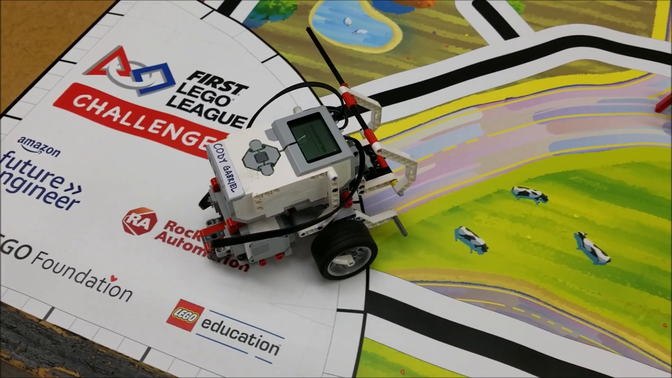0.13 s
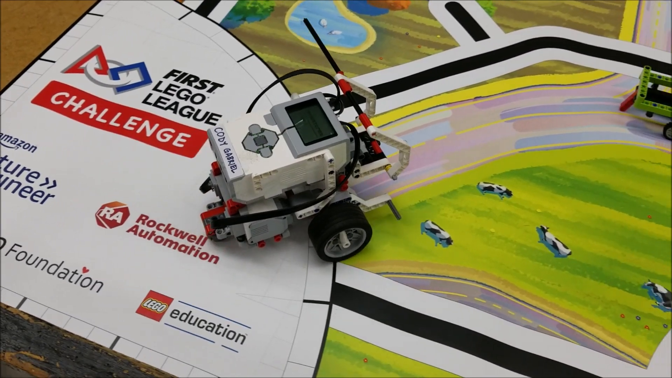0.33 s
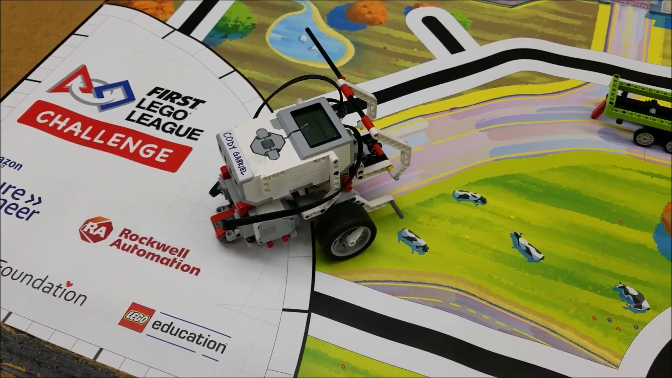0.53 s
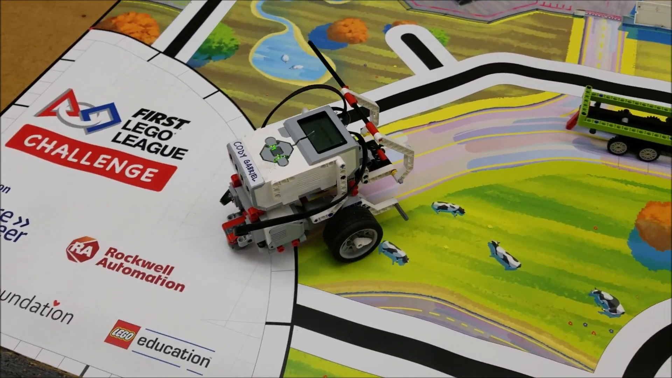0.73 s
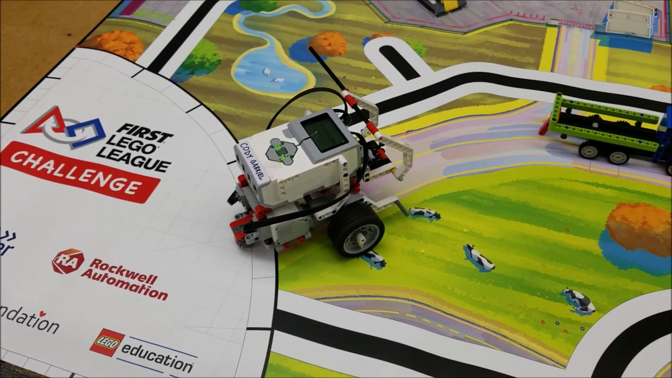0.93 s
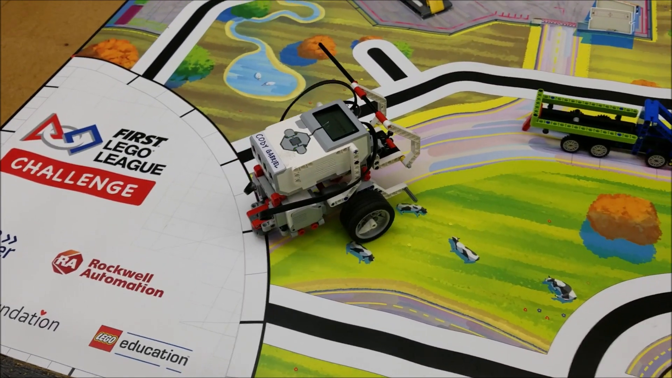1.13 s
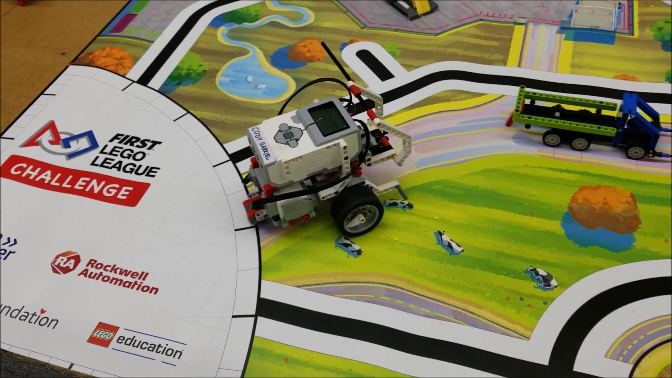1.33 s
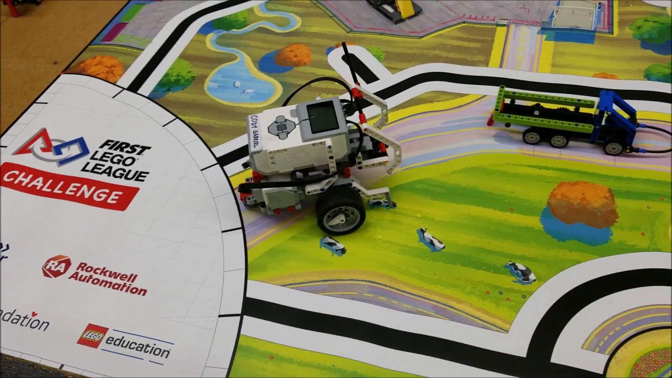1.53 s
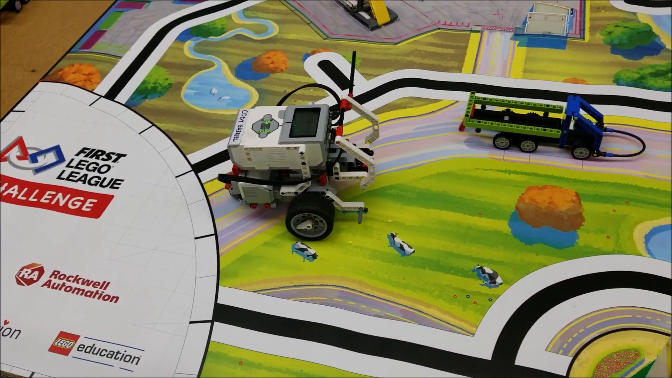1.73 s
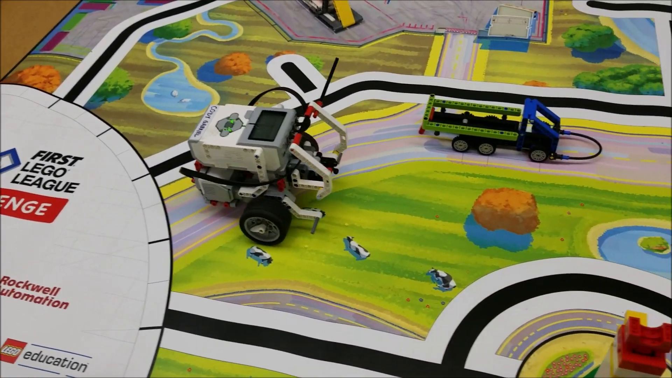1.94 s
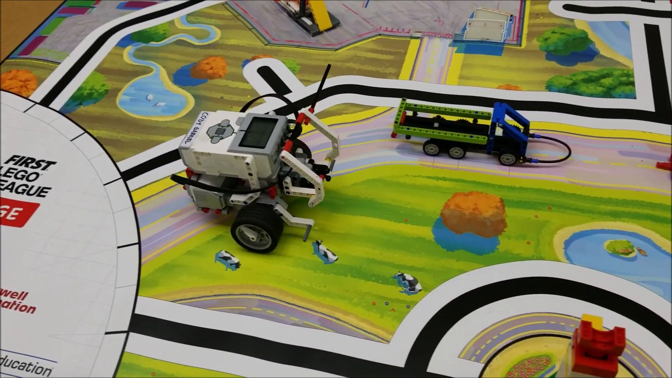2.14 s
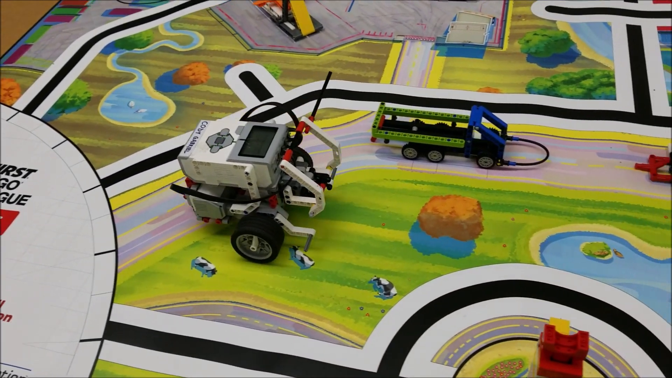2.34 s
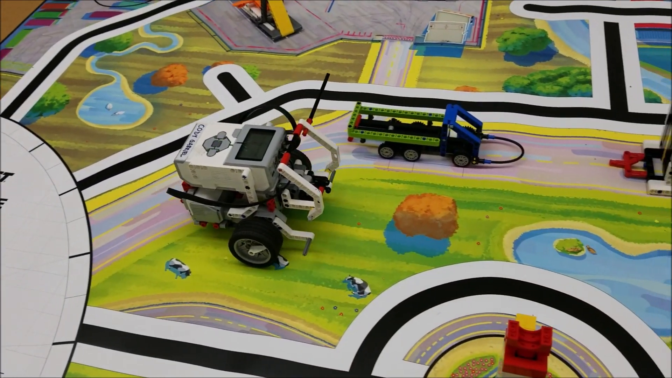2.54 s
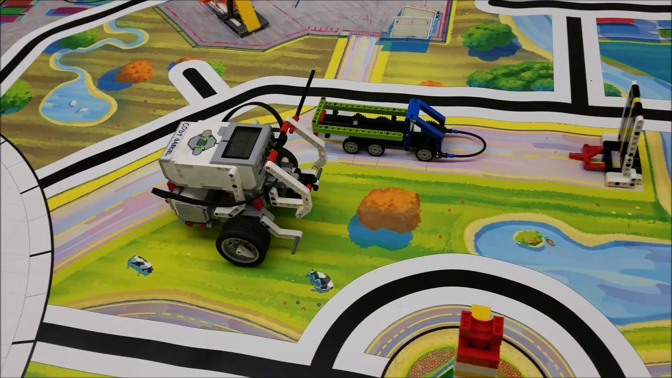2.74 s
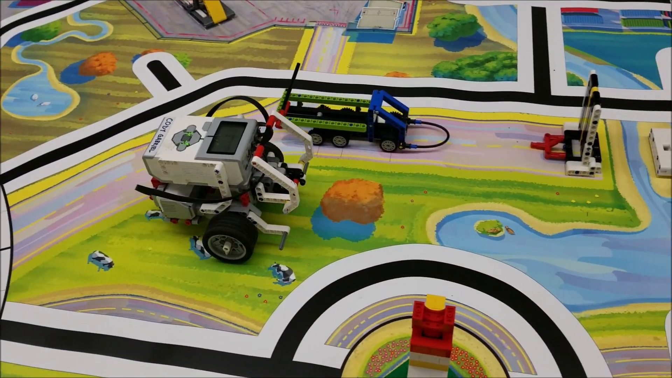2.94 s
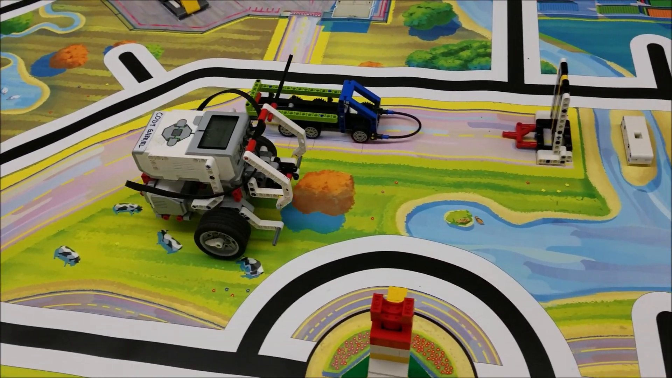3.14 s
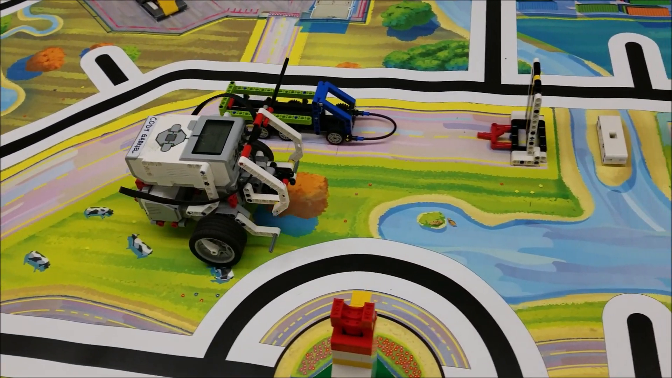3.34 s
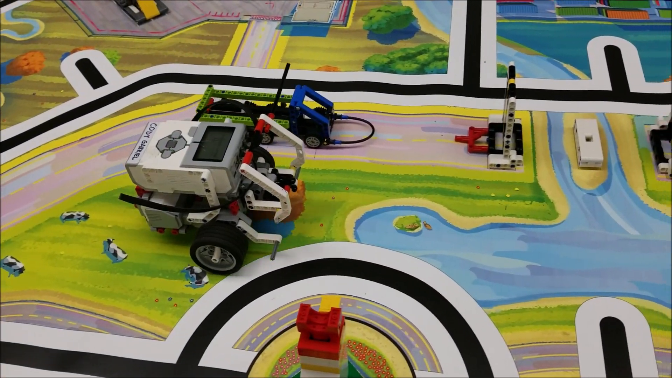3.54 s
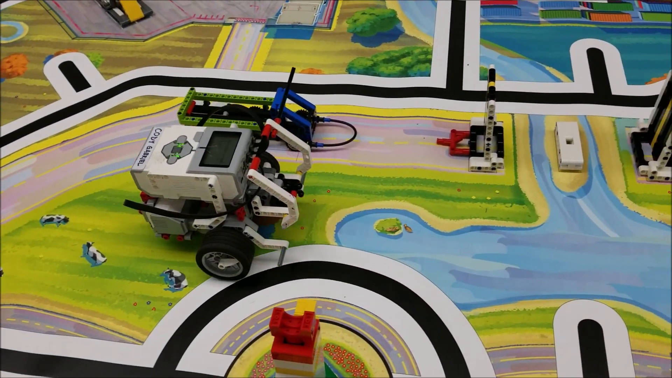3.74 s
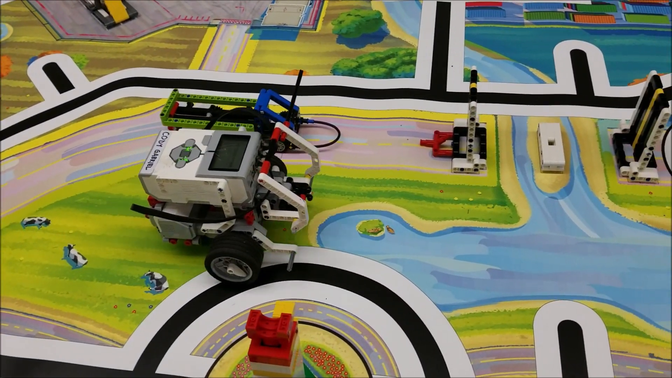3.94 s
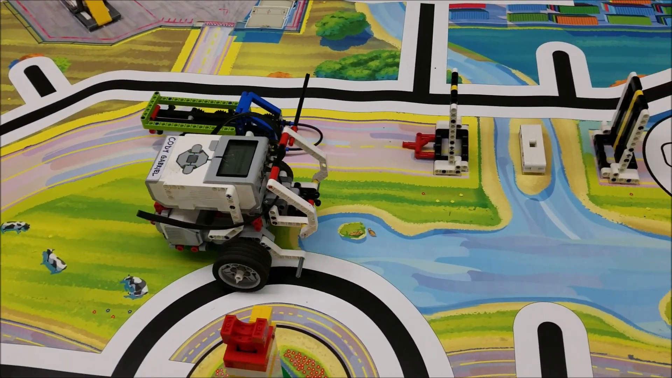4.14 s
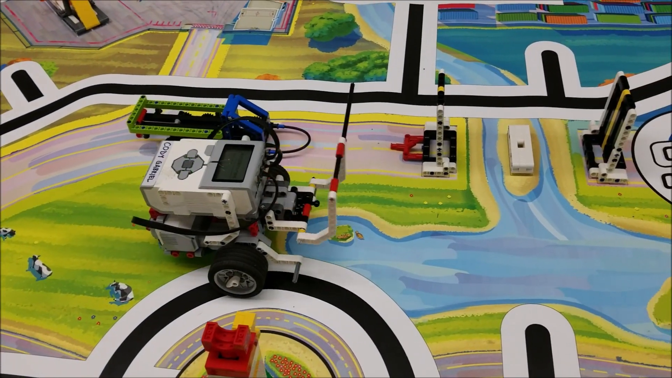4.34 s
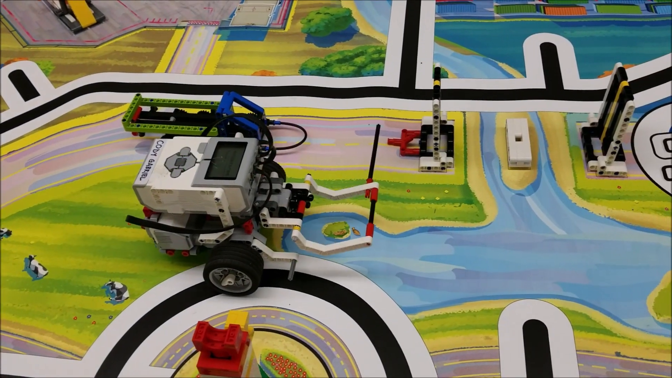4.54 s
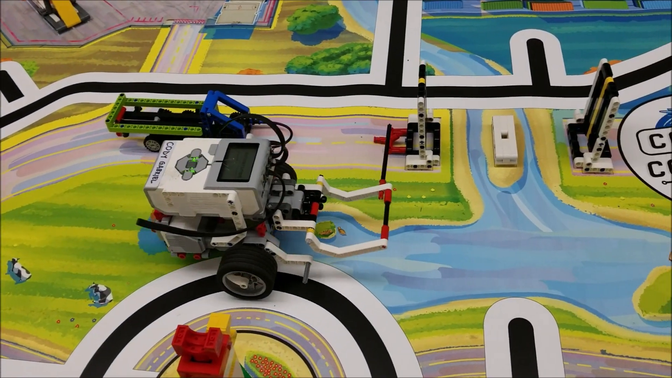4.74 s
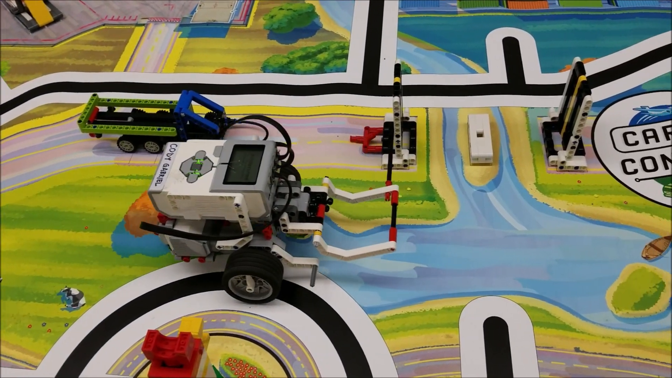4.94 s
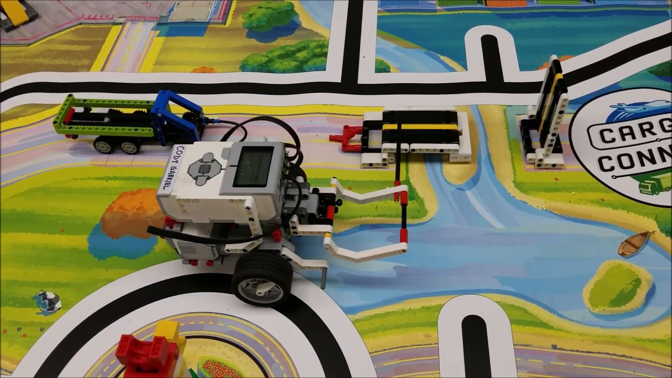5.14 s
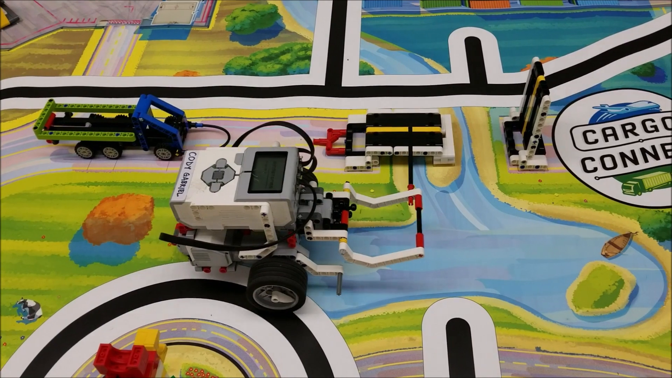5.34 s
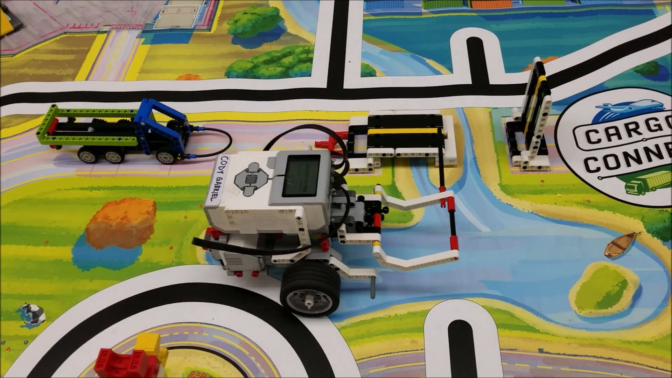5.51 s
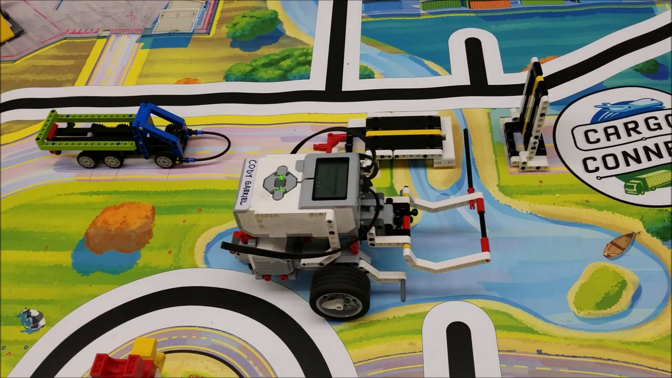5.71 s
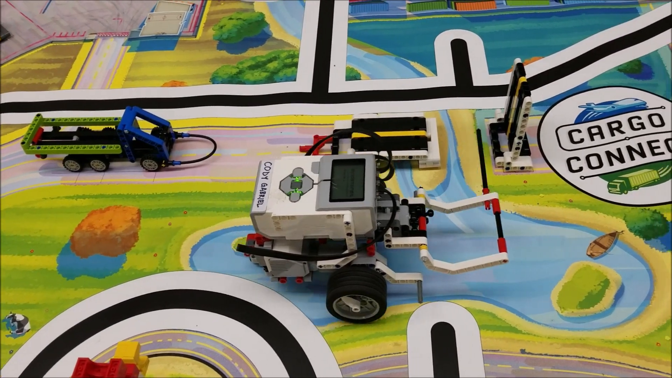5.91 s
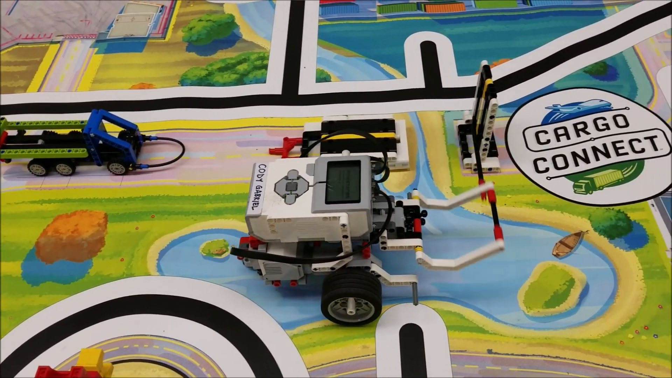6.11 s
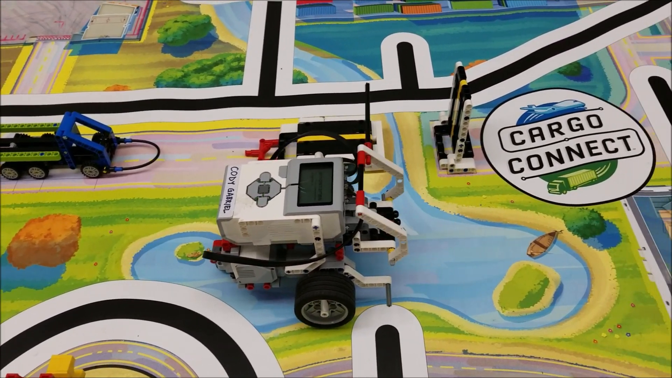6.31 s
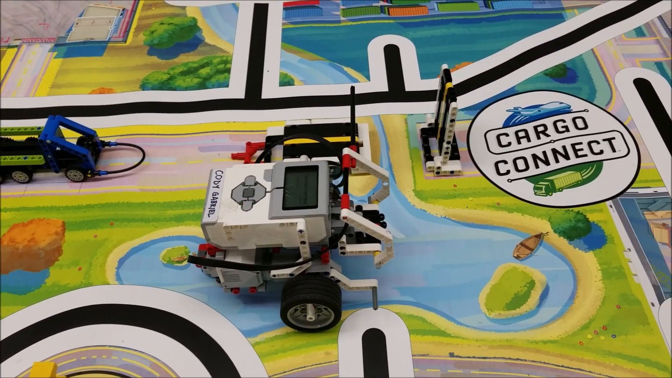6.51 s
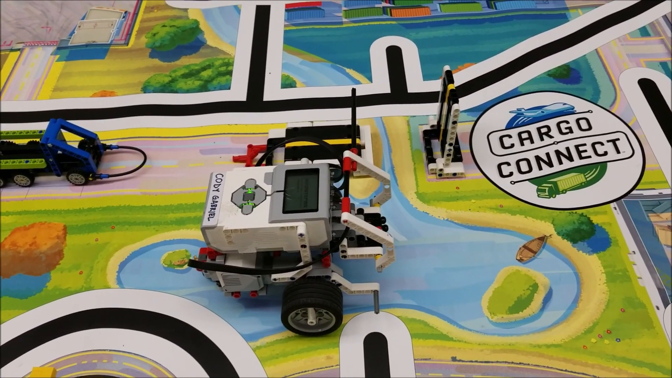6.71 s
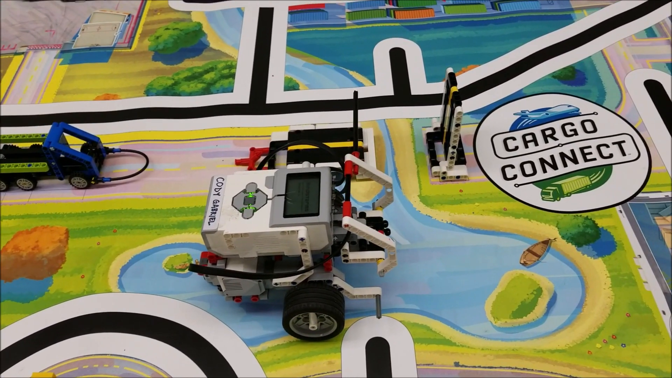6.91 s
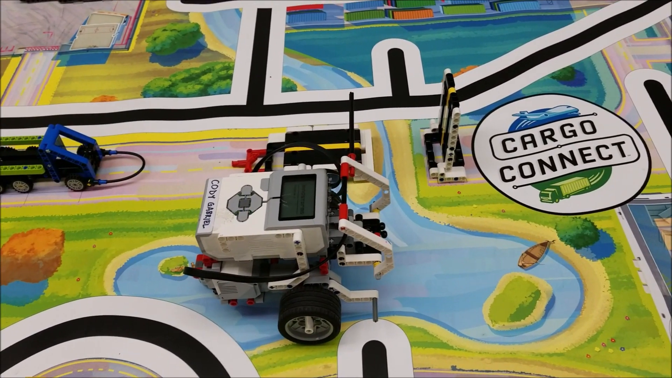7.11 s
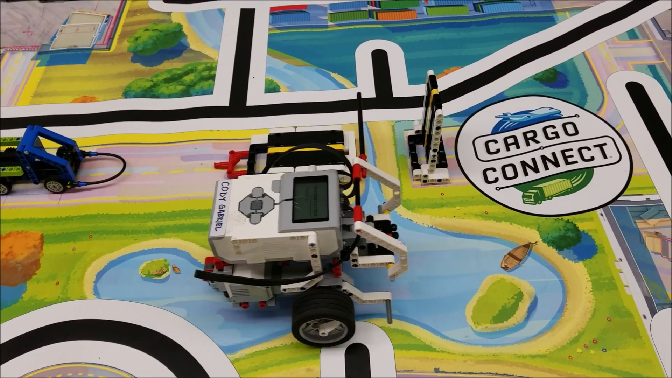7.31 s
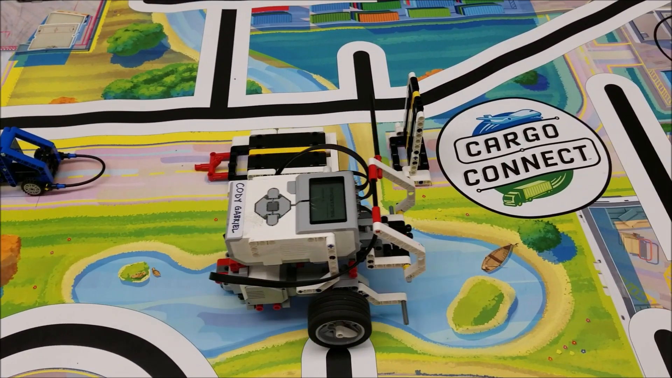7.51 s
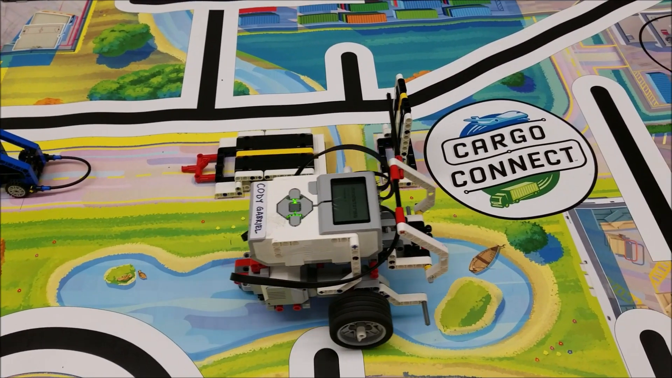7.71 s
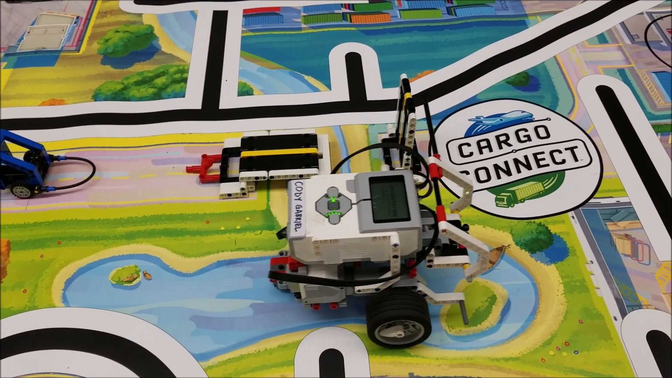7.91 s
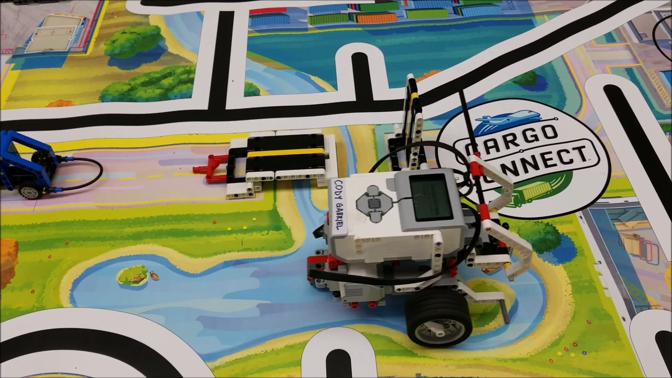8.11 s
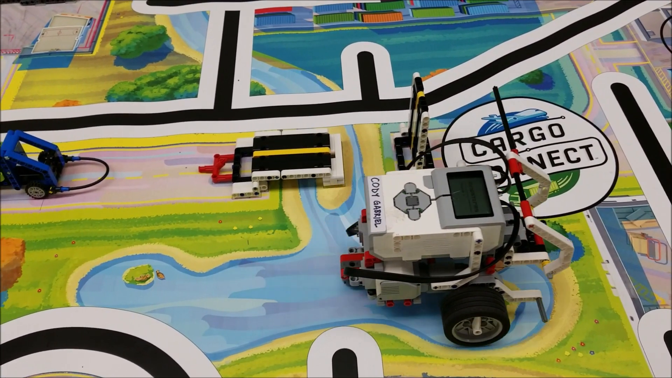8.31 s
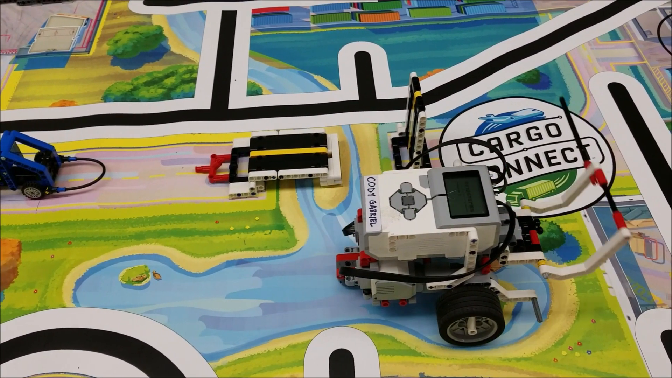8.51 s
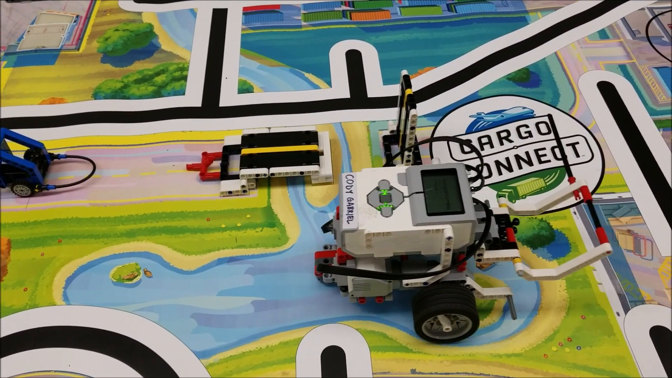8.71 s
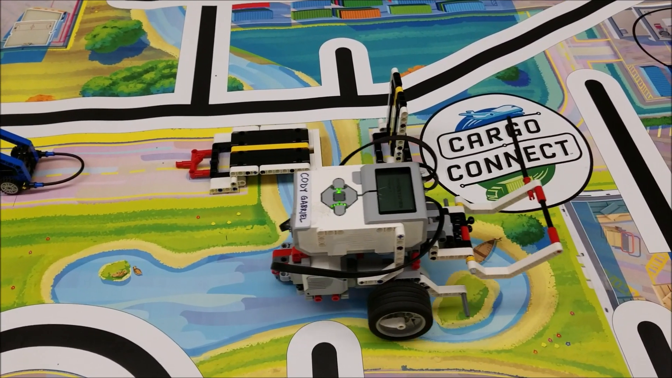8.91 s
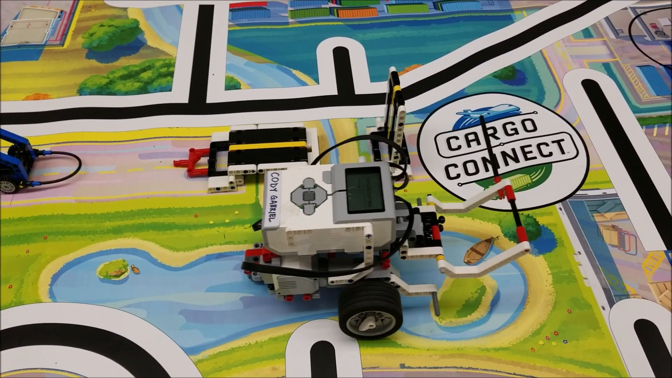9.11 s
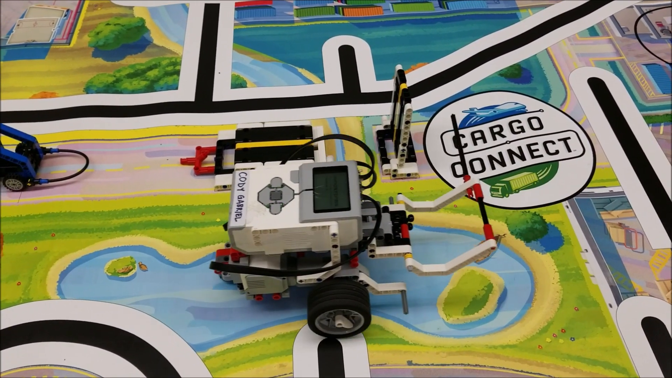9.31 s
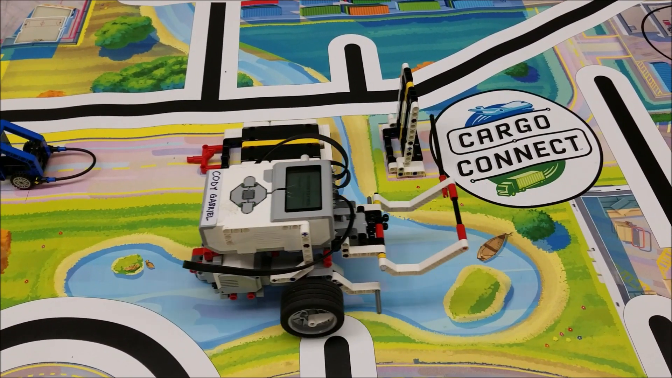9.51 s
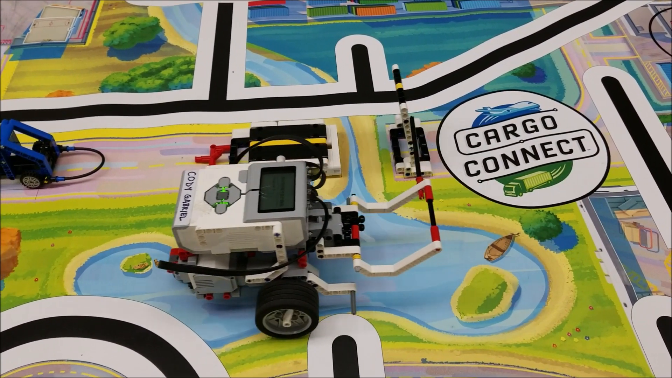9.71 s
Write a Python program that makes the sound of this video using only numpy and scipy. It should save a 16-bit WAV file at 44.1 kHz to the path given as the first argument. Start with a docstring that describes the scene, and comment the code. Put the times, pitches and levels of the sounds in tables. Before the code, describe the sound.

A small toy robot drives in short bursts with bright gear whine and plastic clatter, and midway a plastic lever slaps down hard on a table.

```python
"""A bright gear whine and plastic clatter, under way from the start: a toy robot drives in short runs over
a mat on a wooden table, close to a phone's two microphone ports in a quiet room. Tooth-mesh harmonics make the
whine, tooth impacts the clatter. Around the runs a smaller arm motor rasps, gears click as they take up slack and
the arm clacks on its stop; once a plastic lever slaps down (noise bursts) and the table booms (ringing modes).
Tyre creaks, a short room tail, low rumble, hum and faint hiss lie around and behind it."""
import sys
import numpy as np
from scipy import signal
from scipy.fft import rfft, irfft, next_fast_len
from scipy.io import wavfile

SR = 44100
rng = np.random.default_rng(int(sys.argv[2]) if len(sys.argv) > 2 else 0)


def transcribe(signal):
    """Save signal, clipped to [-1, 1], as a 16-bit WAV file at the path in sys.argv[1]."""
    frames = np.atleast_2d(signal).T
    limited = np.clip(frames, -1, 1)
    pcm = np.round(limited * 32767).astype(np.int16)
    wavfile.write(sys.argv[1], SR, pcm)


N = 429975
T = np.arange(N) / SR  # s

TOP_HZ = 15800  # upper limit of the phone's microphones
SWITCH_HZ = 13200  # thin whistle of the switching motor drivers
TEETH = 10  # on each pinion
SET_OFF, PIVOT, CRUISE, HURRY, APPROACH, REVERSE = range(6)  # gaits

# Levels at a crawl against full speed, in dB: every run swells with its speed.
CRAWL_WHINE_DB, CRAWL_GROWL_DB, CRAWL_CLATTER_DB = -22.5, -13.5, -15.5
# Speeding up presses the teeth together: more whine, less clatter.
LOAD_WHINE_DB, LOAD_GROWL_DB, LOAD_CLATTER_DB = 3.5, 0.5, -2
CLATTER_EASE_SHARE = 0.26  # the clatter follows the change at the top only in part
BED_IN_S = 0.51  # the whine takes about this long to find its steady colour
GROWL_PAN_DB, CLATTER_PAN_DB = 1, 3.5  # left minus right
WHINE_EXTRA_LEAD_MS = 0.025  # added to the run's lead at the left port

# Balance of the whine between the ports. Each row: frequency in Hz, left minus right in dB.
WHINE_PORT_BALANCE = [(1220, 2), (1620, -5.5), (2030, -1), (2440, -6), (2850, 8), (5000, 3)]
# Runs of the wheel motors over the mat; one with next to no spin-up carries on at speed.
# Each row: start in s, brake in s, gait, spin-up in s, ramp in Hz per s, peak mesh rate in Hz,
# steady mesh rate in Hz, whine in dB, growl in dB, clatter in dB, change of whine and growl at the top of the
# overshoot in dB, tilt of the whine at the start in dB per octave, speed mismatch of the wheels as a share
# (before its random scaling), lead of the gears at the left port in ms.
WHEEL_RUNS = [ (-.1, 1.142, SET_OFF, 0.019, 700, 409.5, 406.6, -52.5, -58, -51.5, -2, -2, 0.003, 0.065),
              (1.264, 1.843, PIVOT, 0.105, 906, 414.2, 412.8, -61, -60.5, -63.5, -2, -9.5, 0.003, 0.06),
              (1.931, 4.2, CRUISE, 0.19, 629.5, 449.3, 404.9, -52.5, -59, -53.8, -4.5, 0.5, 0.0051, 0.082),
              (4.539, 5.2, CRUISE, 0.2, 733, 482.7, 421.2, -54.5, -56.5, -52.7, -3, 1, 0.0045, 0.077),
              (5.185, 6.088, HURRY, .02, 738.5, 425.8, 419, -53, -59.5, -54, -0.5, -0.5, .002, 0.059),
              (7.154, 8.317, APPROACH, .216, 808.6, 478.1, 403.7, -54, -56, -53, -12.5, -5.5, 0.003, 0.026),
              (8.669, 9.906, REVERSE, 0.19, 761.7, 458.7, 406.3, -54.5, -57.5, -54, 4.5, 3, 0.0036, 0.026),
              ]


def drive(switch_db=-79):
    """Two geared wheel motors whine, growl and clatter; speed and load set the loudness."""
    whines, gears = np.zeros((2, N)), np.zeros((2, N))
    for (start, brake, gait, spin_up_s, hz_per_s, peak_hz, steady_hz, whine_db, growl_db, clatter_db,
         top_db, tilt_db, mismatch, lead_ms) in WHEEL_RUNS:
        t = T[(T > start - .01) & (T < brake + COAST_S + .01)]
        hunting = HUNT_REVERSE if gait == REVERSE else HUNT_FORWARD
        hz, load, easing = motor_speed(t, start, brake, spin_up_s, hz_per_s, peak_hz, steady_hz, hunting)
        bedding_in = np.exp(-((t - start) / BED_IN_S) ** 2)
        tone, rattle = wheel_pair(hz, mismatch, gait, tilt_db * bedding_in)
        # the low part of the rattle, a growl, follows the whine; the rest sizzles with the clatter
        low = signal.sosfiltfilt(signal.butter(4, 3600, fs=SR, output="sos"), rattle)

        def level(crawl_db, full_db, load_db, top_share=1):
            swell_db = np.interp(hz, [CRAWL_HZ, steady_hz], [crawl_db, 0])
            return undb(full_db + swell_db + load_db * load + top_share * top_db * easing)

        tone = unit(tone) * level(CRAWL_WHINE_DB, whine_db, LOAD_WHINE_DB)
        growl = unit(low) * level(CRAWL_GROWL_DB, growl_db, LOAD_GROWL_DB)
        sizzle = unit(rattle - low) * level(CRAWL_CLATTER_DB, clatter_db, LOAD_CLATTER_DB, CLATTER_EASE_SHARE)
        whistle = undb(switch_db + 2 * walk(7.8, size=len(t))) * np.sin(2 * np.pi * SWITCH_HZ * t)
        on = gate(t, start, brake + COAST_S)
        add(whines, t[0], spread_by_pitch(on * tone, WHINE_PORT_BALANCE, lead_ms + WHINE_EXTRA_LEAD_MS))
        add(gears, t[0], ports(on * growl, lead_ms, GROWL_PAN_DB))
        add(gears, t[0], ports(on * (sizzle + whistle), lead_ms, CLATTER_PAN_DB))
    return whines, gears


# Whine of the wheel gears at full speed. Each row: multiple of the mesh rate, then the level in dB
# when setting off, pivoting, cruising, hurrying, approaching and reversing.
WHINE_HARMONICS = [(2, -36, -30, -20, -36, -26, -36), (3, -13, -15, -13, -11, -15.5, -9.5),
                   (4, -5, -12, -4.5, -3, -2.5, -4.5), (5, -4, -6, -10, -6, -7, 2),
                   (6, -6.5, -13, -8.5, -1.5, -4, -5), (7, -8, 0, -11.5, -7, -4, -2),
                   (8, -12, -16, -12.5, -10, -8, -3.5), (9, -15, -15, -17.5, -16, -13, -8),
                   (10, -20, -20, -24, -18, -13, -12), (11, -18, -21, -27, -22, -16, -5),
                   (12, -24, -17, -25, -22, -15, -14)]
# Colour of the gear casings. Each row: frequency in Hz, then the response in dB
# when setting off, pivoting, cruising, hurrying, approaching and reversing.
CASING_COLOUR = [(790, -31.5, -30, -26.5, -23, -24.5, -27), (1068, -19, -23, -16.5, -13, -14.5, -21.5),
                 (1473, -9.5, -8, -3.5, -3.5, -4, -1), (2200, -8, -4, -4.5, -1.5, -4, -2),
                 (2500, -3.5, -9, -2.5, -3.5, -3, 2.5), (2980, -12.5, -14.5, -8, -8.5, -11, -4.5),
                 (4040, -5, -8.5, -6.5, -3, -5, -9), (5310, 2.5, -5, -4, 4.5, 4, -7),
                 (8420, -3.5, -14, -8, 0.5, -2.5, -7.5), (11000, 6.5, -10, -1, 7, 7.5, -4),
                 (10800, -6.5, -16, -9, 1.5, 1.5, -12), (12800, 3, -9, -8.5, 2, 4, -7),
                 (13800, -3.5, -19, -11, 0.5, 2, -10), (15850, -41, -30, -27, -29, -22, -20)]


def wheel_pair(hz, mismatch, gait, tilt_db):
    """Two motors run at slightly different, wandering speeds, so their whines beat."""
    columns = [0, int(round(gait)) + 1]
    orders = np.array(WHINE_HARMONICS)[:, columns]
    casing = np.array(CASING_COLOUR)[:, columns]
    split = mismatch * (.9 + .6 * walk(7, size=len(hz)))
    tone = rattle = 0
    for side, motor_db in ((.5, 3.0), (-1, -6)):
        speed = hz * (1 + side * split + .002 * walk(70, size=len(hz)))
        mesh = np.cumsum(speed) / SR + rng.random()  # teeth passed so far
        ticks = teeth(mesh, uneven_db=0.5, scatter_db=0.95, scrape=0.53, tick_db=-4.0)
        tone = tone + undb(motor_db) * whine(mesh, speed, orders, tilt_db)
        rattle = rattle + undb(motor_db) * ticks
    # the small casings radiate no bass
    return tone, unit(colour(rattle, [(250, -48), (600, -29), *casing]))


CRUISE_HZ = 408  # mesh rate to which the whine levels refer
# The casing's sharpest resonance, which the fourth harmonic sweeps through.
RESONANCE_HZ, RESONANCE_WIDTH_HZ, RESONANCE_DB = 1585, 56, 6.5
# The next gear stage: distance below each harmonic as a share of the mesh rate, and strength.
STAGE_RATIO, STAGE_DEPTH = .283, 0.15
TURN_DEPTH = .4  # how far the pressure on the teeth varies within a shaft turn


def whine(mesh, hz, orders, tilt_db, flutter_db=1.64):
    """Mesh harmonics swell across casing resonances, vary over each shaft turn and shake in the gears' play."""
    multiple, db = np.transpose(orders)
    eccentric = mesh + .012 * np.sin(2 * np.pi * mesh / TEETH)
    turn = np.linspace(0, 1, 64)
    out = 0
    for k in np.round(multiple):
        ripple = sum(np.sin(2 * np.pi * (m * turn + rng.random())) / m for m in range(1, 6))
        pressure = np.interp(mesh / TEETH % 1, turn, 1 + TURN_DEPTH * ripple)
        order_db = np.interp(k * hz / CRUISE_HZ, [1.8, 2, *multiple], [-45, -28, *db])
        resonance_db = RESONANCE_DB / (1 + ((k * hz - RESONANCE_HZ) / RESONANCE_WIDTH_HZ) ** 2)
        treble_db = tilt_db * np.log2(np.maximum(k * hz / RESONANCE_HZ, 1))
        gain = undb(order_db + resonance_db + treble_db + flutter_db * walk(70, size=len(hz)))
        backlash = .0045 * walk(60, size=len(hz))
        phase = 2 * np.pi * (k * (eccentric + backlash) + rng.random())
        stage = np.sin(phase - 2 * np.pi * (STAGE_RATIO * mesh + rng.random()))
        tone = np.sin(phase) + STAGE_DEPTH * stage
        # small parts radiate their higher tones a little better
        out = out + k ** .2 * gain * pressure * tone
    return unit(out)


def teeth(mesh, uneven_db, scatter_db, scrape, tick_db, jitter=.06):
    """Each tooth ticks a little early or late, then scrapes; the pinion's unevenness repeats once a turn."""
    mesh = mesh + jitter * np.interp(mesh, np.arange(8192), rng.standard_normal(8192))
    tooth = np.maximum(mesh, 0).astype(int)
    pattern = unit(rng.standard_normal(TEETH))
    scatter = rng.standard_normal(8192)
    force = undb(uneven_db * pattern[tooth % TEETH] + scatter_db * scatter[tooth])
    tick = np.diff(tooth, prepend=tooth[0]) * 1.
    rub = np.exp(-(mesh % 1) / scrape) * rng.standard_normal(len(mesh))
    return unit(force * (unit(rub) + undb(tick_db) * unit(tick)))


CRAWL_HZ, WANDER_SHARE = 291, .0042  # lowest mesh rate, and random wander of the speed
SETTLE_S, BRAKE_S, COAST_S = .124, 0.031, 0.112  # settling, braking, and run-out after the brake
EASE_S, EASE_LEAD_S = 0.022, 0.013  # the drive eases off just before the top
# Hunting after the overshoot: period, decay, its share forwards and in reverse.
HUNT_PERIOD_S, HUNT_DECAY_S, HUNT_FORWARD, HUNT_REVERSE = .165, 0.29, .27, 0.061


def motor_speed(t, start, brake, spin_up_s, hz_per_s, peak_hz, steady_hz, hunting):
    """Mesh rate, load and easing: a motor ramps up, overshoots, hunts as it settles, then brakes to a crawl."""
    since_top = t - start - spin_up_s
    after = np.maximum(since_top, 0)
    swing = np.exp(-after / HUNT_DECAY_S) * np.cos(2 * np.pi * after / HUNT_PERIOD_S)
    excess = (1 - hunting) * np.exp(-(after / SETTLE_S) ** 1.2) + hunting * swing
    driven = steady_hz + (peak_hz - steady_hz) * excess + hz_per_s * np.minimum(since_top, 0)
    braking = np.exp(-np.maximum(t - brake, 0) / BRAKE_S)
    hz = CRAWL_HZ + np.maximum(driven - CRAWL_HZ, 0) * braking
    load = np.sin(np.pi * np.clip((t - start) / spin_up_s, 0, 1))
    easing = np.exp(-((since_top + EASE_LEAD_S) / EASE_S) ** 2)
    return hz * (1 + WANDER_SHARE * walk(12, size=len(t))), load, easing


def spread_by_pitch(x, balance, lead_ms):
    """Standing waves over the table make each pitch louder at one port than at the other."""
    size = next_fast_len(len(x))
    balance_db = at_hz(balance, np.fft.rfftfreq(size, 1 / SR))
    pan = undb(np.outer([.5, -.5], balance_db))
    return irfft(rfft(ports(x, lead_ms, 0), size) * pan, size)[:, :len(x)]


# Swings of the arm, between and after runs. Each row: start in s, end in s, level at the start in dB,
# level at the end in dB.
ARM_SWINGS = [(4.282, 4.511, -62.5, -60.5), (6.163, 6.312, -56.5, -50.5), (8.416, 8.539, -68, -62),
              (8.541, 8.638, -60.5, -64)]
# Colour of the arm motor's casing. Each row: frequency in Hz, response in dB.
ARM_COLOUR = [(700, -13), (1400, 3.5), (2500, 2), (4500, -2.5), (5600, 1), (6900, 5), (8400, -8.5),
              (10300, -1), (11200, -1), (12800, 10.5), (15500, -1.5)]


def arm(mesh_hz=410, fade_s=0.026):
    """The small arm motor rasps, its tooth ticks less even than the wheels', with the drivers' whistle."""
    mesh = np.cumsum(mesh_hz * (1 + 0.066 * walk(8.1))) / SR
    ticks = teeth(mesh, uneven_db=-4.0, scatter_db=2, scrape=0.5, tick_db=-9.0)
    rasp = unit(colour(ticks, [(250, -35), *ARM_COLOUR]))
    rasp = rasp + undb(-12.0) * np.sin(2 * np.pi * SWITCH_HZ * T)
    effort = 0
    for start, end, first_db, last_db in ARM_SWINGS:
        level = undb(np.interp(T, [start, end], [first_db, last_db]))
        effort = effort + level * gate(T, start, end, fade_s)
    return ports(rasp * effort, 0.025, 1.3)


# The arm meets its stop. Each row: time in s, level in dB.
STOP_HITS = [(6.3092, -37.5), (6.313, -44.5)]
# Colour of the struck arm frame. Each row: frequency in Hz, response in dB.
FRAME_COLOUR = [(200, -7), (650, -12), (900, -12), (1270, 3.5), (1900, -2), (2300, -5), (2800, -9),
                (6300, -10), (8600, -16), (12900, -8), (15800, -22)]
# Ringing beams of the arm. Each row: frequency in Hz, level in dB, t60 in s.
ARM_BEAMS = [(1270, -19, 0.07), (1375, -1, 0.039), (1615, -15, 0.047), (1880, 0.5, 0.04), (2224, 2, 0.036),
             (2490, -16, 0.05)]
# Modes of the wooden table top, also rung by the lever. Each row: frequency in Hz, level in dB, t60 in s.
TABLE_MODES = [(59.4, -4, 0.57), (75.5, -19, 0.49), (111, -0.5, 0.3), (122, 2.5, 0.28), (171.1, -1.5, 0.34),
               (199, -15, 0.35), (252.8, -10, 0.13), (288.5, -16, 0.15), (443, -10, 0.25), (520, -16, 0.36),
               (854, -17, 0.13)]


def arm_stop(beam_db=-43, table_db=-55):
    """The raised arm clacks on its stop; its beams ring and the jolt stirs the table's lowest modes."""
    out = ports(contacts(STOP_HITS, FRAME_COLOUR, decay_s=0.0035), 0.0077, 0.94)
    beams = undb(beam_db) * ring(ARM_BEAMS, T[:SR])
    table = undb(table_db) * ring(TABLE_MODES[:3], T[:SR])
    add(out, STOP_HITS[0][0], ports(beams + table, 0.016, 1.6))
    return out


# Gears taking up slack. Each row: time in s (the click comes 1.5 ms later), level in dB before the
# common gain, ring in Hz.
SLACK_CLICKS = [(1.2212, -40.5, 9600), (1.931, -44.5, 9680), (1.9867, -37, 10500), (4.2831, -47, 11070),
                (4.288, -54, 12200), (4.5276, -47, 13230), (7.148, -45.5, 13200), (8.3922, -44, 10000),
                (8.515, -41.5, 12200)]


def slack(decay_s=0.00095, gain_db=-2, width_hz=6000):
    """A small click as a gear train reverses its load: a short resonant noise burst."""
    out, t = np.zeros((2, N)), T[:SR // 20]
    for s, db, hz in SLACK_CLICKS:
        resonance = signal.iirpeak(min(hz, TOP_HZ), hz / width_hz, fs=SR)
        click = unit(signal.lfilter(*resonance, rng.standard_normal(len(t))))
        click = click * np.exp(-t / decay_s) * undb(db + gain_db)
        add(out, s + 0.0015, ports(click, 0.025, 3.0))
    return out


# The lever slaps down and rattles. Each row: time in s, level in dB.
LEVER_SLAPS = [(5.1831, -14), (5.185, -22.5), (5.1891, -20.5), (5.1924, -28), (5.196, -24), (5.2235, -31.5)]
# Colour of the plastic lever. Each row: frequency in Hz, response in dB.
LEVER_COLOUR = [(300, -20), (800, 0), (1250, -5.5), (1800, -3.5), (2400, -0.5), (3200, -7), (4100, -3.5),
                (5600, -7), (7100, 0.5), (8800, -8), (10800, 3), (12100, -0.5), (13200, 5), (14300, -1.5),
                (15800, -5.5)]


def lever_slap():
    """The falling plastic lever slaps and rattles, reaching the right port first."""
    return ports(contacts(LEVER_SLAPS, LEVER_COLOUR, decay_s=0.001084), -0.00813, 2.3)


# Bright crack of the first slap. Each row: time in s, level in dB.
SLAP_CRACKS = [(5.183, -15), (5.1838, -15.5), (5.1852, -15.5)]
# Colour of that crack. Each row: frequency in Hz, response in dB.
BRIGHT_COLOUR = [(5000, -36), (8500, -10), (10000, -9), (11300, -4), (12400, 5), (13400, 13), (14400, 2),
                 (15800, -5.5)]


def lever_crack():
    """The first slap's hardest contacts add a very short, treble crack."""
    return ports(contacts(SLAP_CRACKS, BRIGHT_COLOUR, decay_s=0.00067), 0, 3.1)


def contacts(rows, body, decay_s):
    """Hard plastic contacts: bursts of chatter that die fast, coloured by the part that is struck."""
    force = np.zeros(N)
    t = T[:SR // 10]
    for s, db in rows:
        i = int(s * SR)
        force[i:i + len(t)] += undb(db) * np.exp(-t / decay_s)
    chatter = rng.choice([-1., 1.], N)
    # divide by the body's rms response, so the colour leaves the level alone
    spread = np.sqrt(np.mean(undb(at_hz(body, np.linspace(1, TOP_HZ, 512))) ** 2))
    return colour(force * chatter, body) / spread


def table_boom(boom_db=-41, thud_db=-42.5, thud_s=0.061):
    """The falling lever rings the table's low modes and a dense wash of higher ones."""
    out, t = np.zeros((2, N)), T[:SR]
    wash_colour = [(100, -14.0), (260, 10.0), (370, -1.5), (480, 3), (750, -3.5), (1050, -14),
                   (1500, -24.5), (5000, -56.5)]  # Hz, dB
    wash = unit(colour(rng.standard_normal(SR), wash_colour))
    boom = undb(boom_db) * ring(TABLE_MODES, t) + undb(thud_db) * wash * np.exp(-t / thud_s)
    add(out, LEVER_SLAPS[0][0], ports(boom, 0, 2.5))
    return out


def ring(modes, t):
    """Struck modes, each dying at its own pace."""
    onset = np.minimum(t / .001, 1)
    return onset * sum(undb(db - 60 * t / t60) * np.sin(2 * np.pi * (hz * t + rng.random()))
                       for hz, db, t60 in modes)


# Tyres scrub on the mat. Each row: start in s, end in s, level in dB.
TYRE_SCRUBS = [(4.66, 4.785, -77.5), (8.72, 9.03, -76)]
# Colour of the creak. Each row: frequency in Hz, response in dB.
CREAK_COLOUR = [(300, -30), (620, -16), (800, 0), (1020, -2), (1400, -16), (4000, -50)]


def scrub(slip_hz=430):
    """The tyres stick and slip on the mat with a short, dull creak."""
    slips = np.cumsum(slip_hz * (1 + .04 * walk(20))) / SR
    strokes = teeth(slips, uneven_db=1.0, scatter_db=3.0, scrape=.4, tick_db=-4)
    creak = unit(colour(strokes, CREAK_COLOUR))
    level = sum(undb(db) * gate(T, start, end) for start, end, db in TYRE_SCRUBS)
    return ports(creak * level, 0.025, 1.5)


def shifting_room(x, turns_per_s=0.2924):
    """One pattern of reflections gives way to another and back, so tones swell and fade."""
    angle = 2 * np.pi * turns_per_s * T
    return np.cos(angle) * room(x) + np.sin(angle) * room(x)


# Decay of the quiet room. Each row: frequency in Hz, t60 in s.
ROOM_DECAY = [(100, 0.58), (600, 0.4), (2000, 0.18), (7000, 0.23), (15000, 0.15)]


def room(x, gap_s=0.00086):
    """Nearby walls return a short noise-like tail, different at each port; its bass lasts longest."""
    t = T[:SR // 2]
    hz = np.fft.rfftfreq(len(t), 1 / SR)
    edges = [0, *(250 * 2 ** np.arange(7)), SR / 2]  # octave bands, Hz
    noise = rfft(rng.standard_normal((2, len(t))))
    tail = 0
    for lo, hi in zip(edges, edges[1:]):
        band = irfft(noise * ((hz >= lo) & (hz < hi)), len(t))
        tail = tail + band * np.exp(-np.log(1000) * t / at_hz(ROOM_DECAY, (lo + hi) / 2))
    tail = unit(tail * np.minimum(t / gap_s, 1)) / np.sqrt(len(t))
    return signal.fftconvolve(x, tail, axes=1)[:, :N]


# Slow level of the low rumble. Each row: time in s, level in dB.
RUMBLE_LEVEL = [(0, -65), (4.3, -65), (4.8, -63), (5.6, -64.5), (6.7, -69), (7.8, -61.5), (8.5, -66.5),
                (9.2, -60.5), (9.75, -61.5)]
# Colour of the rumble. Each row: frequency in Hz, response in dB.
RUMBLE_TONE = [(13, -49.5), (22, -12), (43, 0), (64, 3), (77, 2.5), (91, -11.5), (124, 1), (137, -4.5),
               (155, -14), (241, -14), (326, -23), (360, -21), (600, -39), (780, -64), (1320, -120)]
# Steady hum. Each row: frequency in Hz, level in dB.
HUM_TONES = [(59, -70.5), (122, -71.5), (162, -84.5), (258, -91)]
# Colour of the hiss. Each row: frequency in Hz, response in dB.
HISS_COLOUR = [(200, -21), (400, 1.5), (520, 3), (800, -5.5), (1300, -4), (3000, -10), (6500, -15),
               (8500, -21), (10500, -10), (12500, -4.5), (15800, 2.5)]


def background(waver_db=2, hiss_db=-74):
    """Rumble, mostly alike at both ports, and wavering hum tones under a faint hiss."""
    common, left, right = (unit(colour(rng.standard_normal(N), RUMBLE_TONE)) for _ in range(3))
    level = undb(curve(RUMBLE_LEVEL)[0] + waver_db * walk(6.9))
    rumble = (ports(common, 0, 2.4) + undb(-4.5) * np.array([left, right])) * level
    hum = sum(undb(db + 1.8 * walk(10.0)) * np.sin(2 * np.pi * hz * T + 1.2 * walk(7.2))
              for hz, db in HUM_TONES)
    hiss = np.array([unit(colour(rng.standard_normal(N), HISS_COLOUR)) for _ in range(2)])
    return rumble + ports(hum, 0, 7.8) + undb(hiss_db) * hiss


def undb(db):
    """Decibels to gain."""
    return np.exp(np.asarray(db) * (np.log(10) / 20))


def unit(x):
    """Scale to an rms of 1."""
    return x / np.sqrt(np.mean(x ** 2) + 1e-20)


def curve(rows):
    """Each column of a timed table, sample by sample."""
    s, *columns = np.transpose(rows)
    return [np.interp(T, s, c) for c in columns]


def at_hz(points, hz):
    """Read (Hz, value) points on a log-frequency axis."""
    f, value = np.transpose(points)
    return np.interp(np.log(np.maximum(hz, 1)), np.log(f), value)


def colour(x, points, size=8192):
    """Causal minimum-phase filter with the given (Hz, dB) response."""
    cepstrum = irfft(np.log(undb(at_hz(points, np.fft.rfftfreq(size, 1 / SR)))))
    # fold the cepstrum onto positive time
    cepstrum[1:size // 2] *= 2
    cepstrum[size // 2 + 1:] = 0
    impulse = irfft(np.exp(rfft(cepstrum)))[:size // 2]
    return signal.fftconvolve(x, impulse)[:len(x)]


def walk(rate, size=N):
    """Smooth chance with a spread of about 1 and `rate` random points a second."""
    steps = rng.standard_normal(4096)
    return 1.2 * np.interp(np.arange(size) * rate / SR, np.arange(len(steps)), steps)


def ports(x, lead_ms, pan_db):
    """Two microphone ports: for positive settings the left hears the sound earlier and louder."""
    size = next_fast_len(len(x) + 64)
    delay = np.exp(-2j * np.pi * np.fft.rfftfreq(size, 1000 / SR) * lead_ms)  # frequencies in kHz
    late = irfft(rfft(x, size) * delay, size)[:len(x)]
    return np.array([x * undb(pan_db / 2), late * undb(-pan_db / 2)])


def add(out, start, x):
    """Mix a stereo sound in at a time in s."""
    i = max(int(start * SR), 0)
    out[:, i:i + x.shape[1]] += x[:, :N - i]


def gate(t, start, end, fade=0.038):
    """1 between two times, with soft edges."""
    return np.clip(np.minimum(t - start, end - t) / fade + .5, 0, 1)


def scene():
    """The robot, the lever and the table, close to the microphones in their room."""
    whines, gears = drive()
    robot = gears + arm() + slack() + arm_stop() + scrub()
    lever, crack, boom = lever_slap(), lever_crack(), table_boom()
    # the near whine arrives mostly direct, so it sends less to the room
    sent = undb(-1) * robot + undb(-7) * whines
    sent = sent + undb(-3.5) * (lever + undb(-10.5) * crack) + undb(-15.5) * boom
    return whines + robot + lever + crack + boom + shifting_room(sent) + background()


def record(dry):
    """The phone cuts the top: a steep low-pass."""
    return signal.sosfilt(signal.ellip(10, .2, 80, TOP_HZ, fs=SR, output="sos"), dry)


dry = scene()
out = record(dry)
transcribe(out)
```